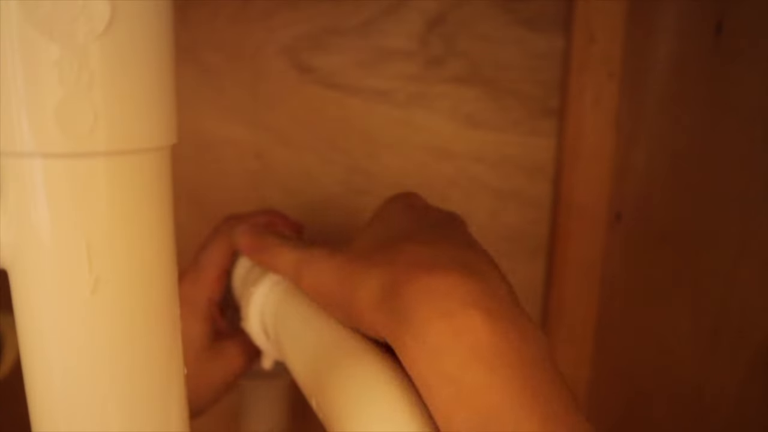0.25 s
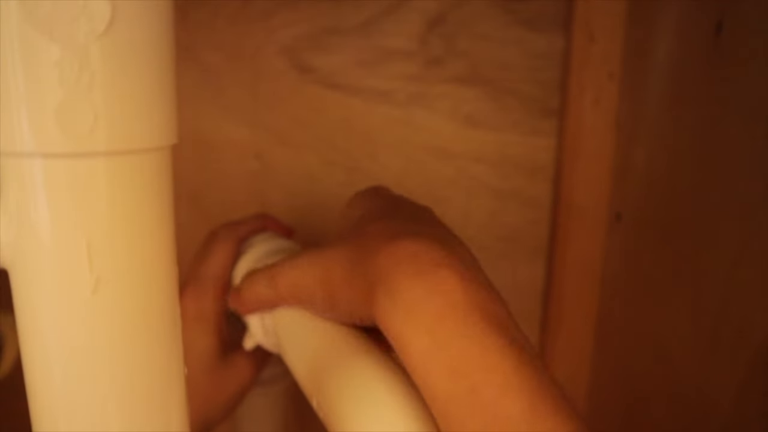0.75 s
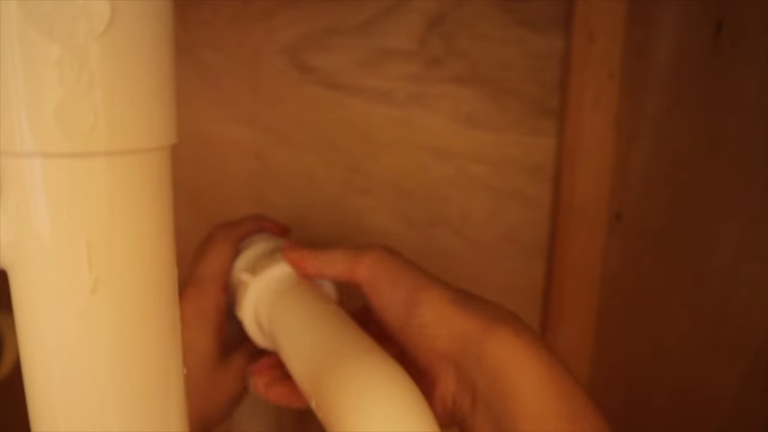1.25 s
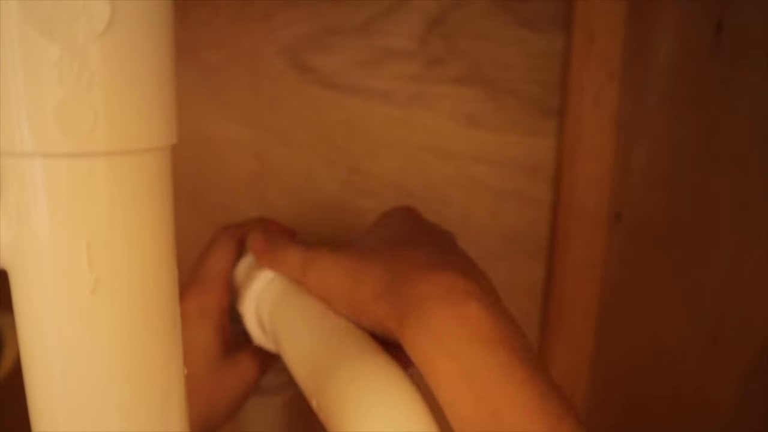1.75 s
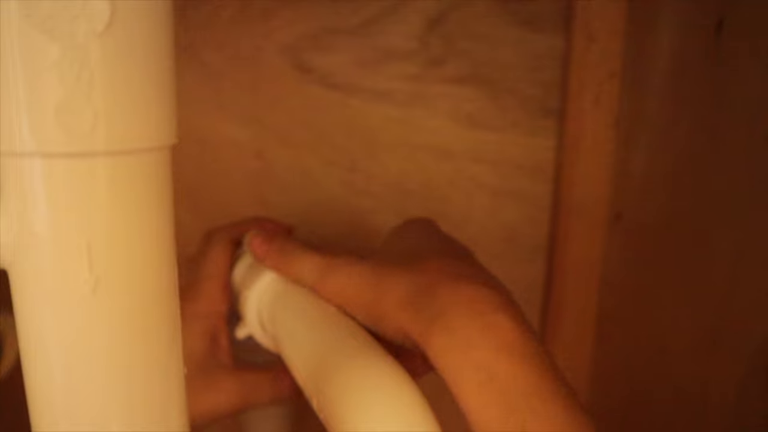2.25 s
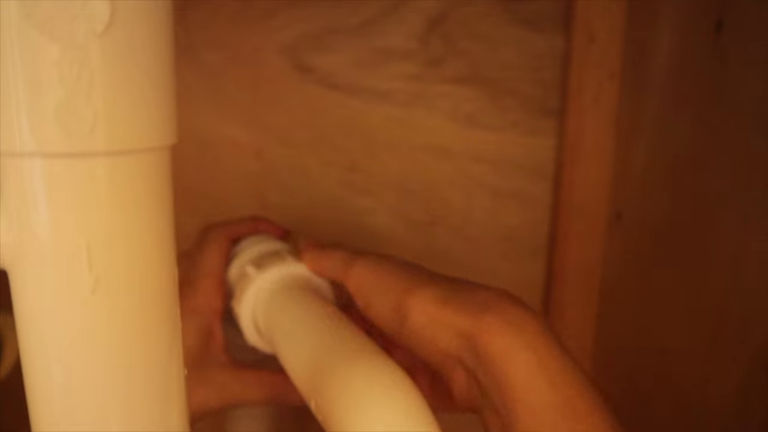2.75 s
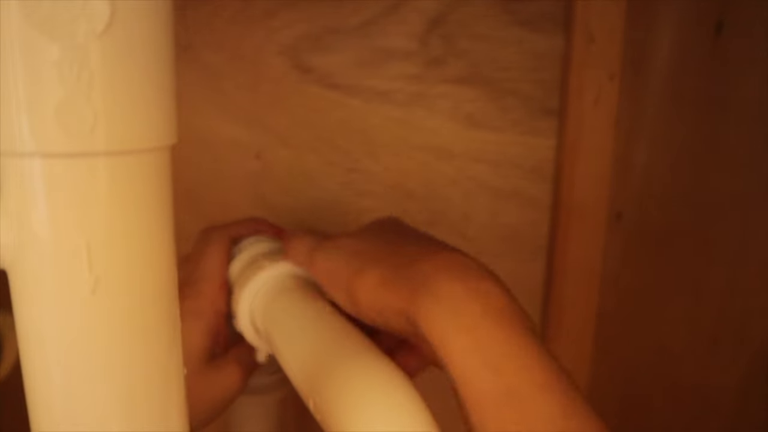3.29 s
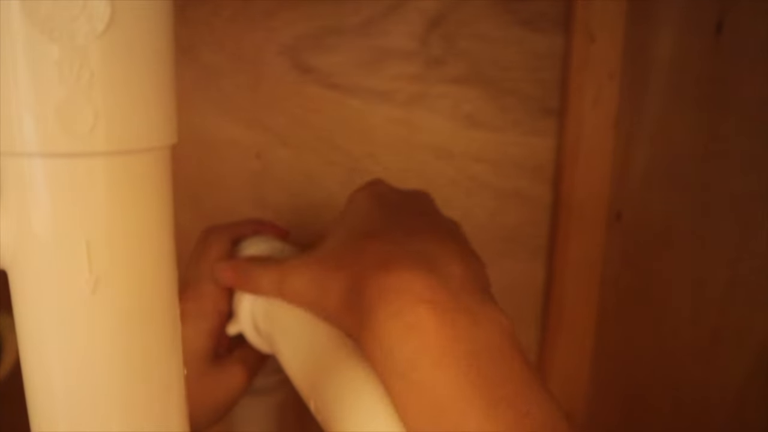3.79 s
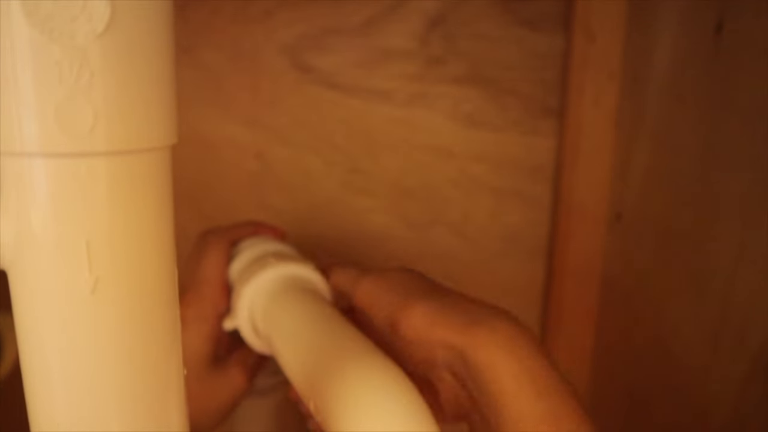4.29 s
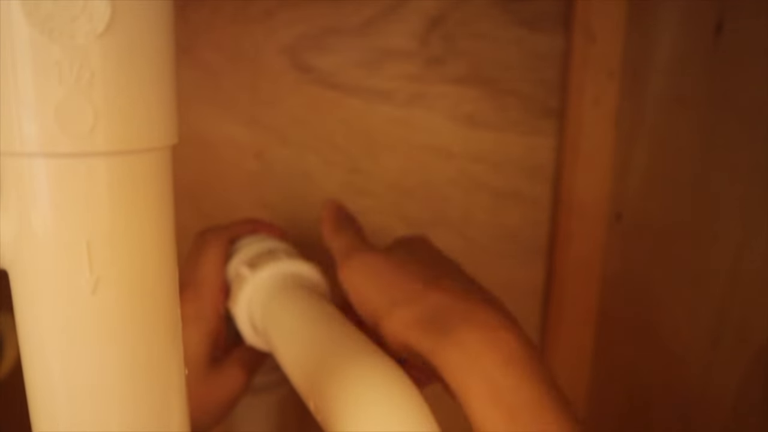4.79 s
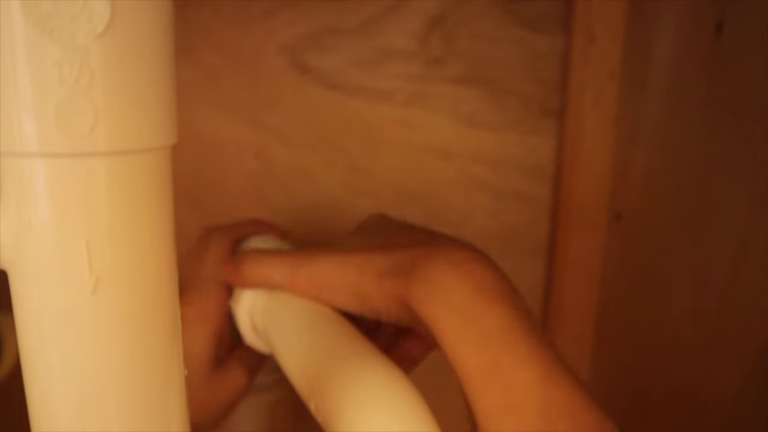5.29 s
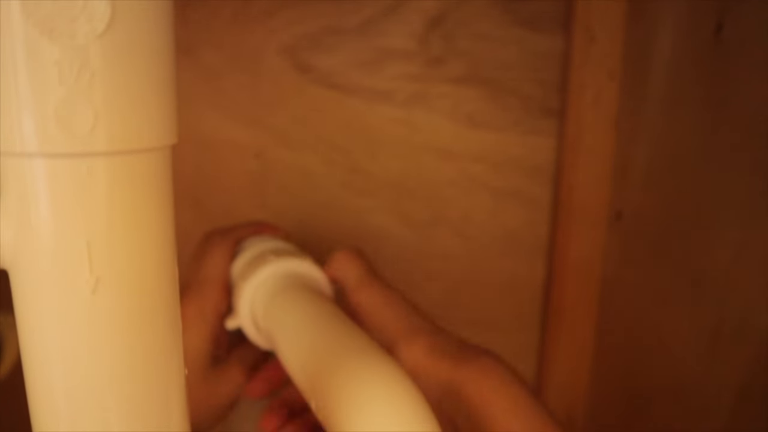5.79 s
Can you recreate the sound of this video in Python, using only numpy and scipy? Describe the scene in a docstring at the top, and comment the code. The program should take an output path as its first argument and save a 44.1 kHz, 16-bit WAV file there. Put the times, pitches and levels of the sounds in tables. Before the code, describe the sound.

Hollow plastic pipe knocks and crisp thread clicks crowd the start, then thin out into soft rubbing strokes and lighter taps, close up.

```python
"""A dull knock and a sharp click come first, as hands screw a plastic slip nut onto a drain pipe.
The work is inside a small wooden cabinet, close to a camera. Knocks and panel thumps are fading sine tones.
Thread clicks are short noise bursts; fingers sliding on plastic are grainy noise; the pipe also murmurs.
A faint falling tone comes late; hiss and a faint hum made from filtered noise lie beneath.
The camera widens the treble difference between its two microphone ports."""
import sys
import numpy as np
from scipy import signal
from scipy.fft import rfft, irfft, next_fast_len
from scipy.io import wavfile
from scipy.ndimage import uniform_filter1d, map_coordinates

SR = 44100
rng = np.random.default_rng(int(sys.argv[2]) if len(sys.argv) > 2 else 0)


def to_wav(sig):
    """Store sig (one row per channel, or 1-D mono) as 16-bit WAV at the path in sys.argv[1].

    Samples outside -1..1 are clipped; the rate is SR.
    """
    pcm = np.clip(np.atleast_2d(sig), -1, 1) * 32767
    pcm = np.round(pcm).astype(np.int16)
    wavfile.write(sys.argv[1], SR, pcm.T)  # frames by channels


N = 266275  # length [samples]

# dull knocks of the pipe: (time [s], peak [dB], pitch of the gripped length [Hz], hardness [dB])
PIPE_KNOCKS = [(0.001, -26, 476, 2.5), (0.063, -31, 350, 6), (0.075, -18.5, 456, -2.5),
               (0.136, -19, 308, 1), (0.231, -33, 362, 0), (0.399, -24, 355, 0), (0.42, -17, 443, -12),
               (0.449, -32.5, 390, -2), (0.504, -15, 372, 6), (0.566, -33, 368, -2), (0.576, -23, 348, 7.5),
               (0.65, -31.5, 358, -10), (0.741, -29, 235, 4), (0.775, -6.5, 365, 8), (0.899, -21.5, 331, 1),
               (0.977, -24, 440, 2.5), (1.47, -12.5, 348, 3), (1.532, -23, 355, 3), (1.756, -32, 363, -8),
               (1.786, -20.5, 256, 6), (1.829, -31.5, 447, 1.5), (1.889, -33.5, 219, 6),
               (1.906, -23, 373, 9), (1.958, -30.5, 467, 2), (2.043, -28.5, 260, 9), (2.154, -34, 288, -2),
               (2.35, -34.5, 252, -1), (2.512, -35.5, 452, 11), (2.64, -35.5, 383, 4),
               (2.728, -34.5, 440, 7), (2.96, -30.5, 237, 14), (3.036, -18.5, 478, 3),
               (3.047, -23.5, 405, -12), (3.218, -31.5, 440, 13), (3.236, -31.5, 467, 9),
               (3.287, -31, 365, 8), (3.357, -28, 475, 1.5), (3.409, -39, 373, 12), (3.512, -34.5, 412, 4),
               (3.524, -34.5, 450, 1), (3.673, -39.5, 247, 7), (3.792, -39.5, 243, 8),
               (3.983, -34.5, 228, 13), (4.048, -30, 456, 4), (4.064, -28.5, 239, 9.5),
               (4.2, -19.5, 372, -2.5), (4.61, -30, 470, 1), (4.794, -24, 224.5, 3), (5.099, -34, 348, -2),
               (5.251, -33, 447, -1), (5.298, -32, 360, -1), (5.472, -21, 234, 8), (5.551, -31, 356, 7),
               (5.805, -24.5, 249, -13), (5.851, -33.5, 234, -9)]
# ways the pipe can ring: (frequency [Hz], relative level [dB], basic time to fade by 60 dB [s])
PIPE_MODES = [(253.3, -3.5, 0.14), (311.6, -4, 0.087), (381.2, 1, 0.071), (449.8, 0, 0.11),
              (499.8, -10, 0.18), (600.6, -4.5, 0.11), (700, -11, 0.061), (857.5, -7.5, 0.084),
              (1050, -14, 0.12), (1314, -12, 0.1), (1526, -11.5, 0.087), (1896, -20, 0.12),
              (2500, -7, 0.071)]
# first push of a blow, at its pitch: (relative level [dB], basic time to fade by 60 dB [s])
FIRST_PUSH = (7.4, 0.017)
# thumps passed into the cabinet panels: (time [s], peak [dB], pitch [Hz])
PANEL_THUMPS = [(0.073, -35, 140), (0.134, -37, 148), (0.415, -42, 124), (0.503, -44, 164),
                (0.577, -30, 144), (0.776, -20.5, 161), (0.899, -25.5, 147), (0.974, -36, 193),
                (1.466, -25, 200), (1.534, -44, 164), (1.784, -36, 168), (1.903, -33.5, 159),
                (2.042, -30.5, 156), (2.153, -38.5, 148), (2.348, -38.5, 178), (2.959, -32.5, 149),
                (3.035, -35, 178), (3.67, -43, 155), (3.974, -35.5, 140), (4.057, -33, 162),
                (4.09, -33, 94), (4.192, -25, 176), (4.795, -27, 125.4), (4.829, -29, 98),
                (4.869, -33, 113), (5.098, -41, 190.8), (5.299, -36, 149), (5.471, -26.5, 151.5),
                (5.803, -39, 151), (5.852, -31.5, 146)]
# notes of a panel: (multiple of the pitch, level [dB], basic time to fade by 60 dB [cycles of the pitch])
PANEL_NOTES = [(1, -1, 12.8), (1.45, -9.5, 10.8)]
# sharp clicks of nut and thread:
# (time [s], level before fading [dB], lower part [dB], top part [dB], ringing pitch [Hz])
THREAD_CLICKS = [(0.001, -41, -2.5, -1, 1960), (0.068, -44, -5, 0, 1970), (0.1193, -44.5, -14, 5, 1650),
                 (0.2138, -53.5, -9, 18, 1930), (0.416, -50, -11, -13, 1650),
                 (0.5025, -37.5, 0.5, -3.5, 1900), (0.577, -33, -15, -22, 1770),
                 (0.6484, -57.5, -9, 2, 2190), (0.7736, -26.5, 3.5, -5, 1920), (0.8973, -52, -17, -9, 2920),
                 (0.935, -46.5, 6, -16, 1970), (0.9735, -39.5, 1, -12, 2000),
                 (1.0178, -52.5, -20, -9, 3500), (1.1502, -54, -12, 12, 2010),
                 (1.3608, -46.5, -4, -14, 2510), (1.4654, -33.5, 4, -6, 1940), (1.5407, -41, 5, -21, 2550),
                 (1.7556, -52, -8, -9, 1700), (1.7815, -29, -2.5, -9, 2460), (1.896, -47, 1, -12, 3800),
                 (1.9091, -41.5, -4, -11, 4070), (1.953, -38, -3, -21, 1870), (2.0385, -45, -9, 9, 3700),
                 (2.156, -50.5, -28, 13, 4270), (2.35, -39.5, 1, -3, 2100), (2.9632, -39, -4, -10, 1800),
                 (3.033, -32, -8, 14, 4100), (3.044, -37.5, -10, -7, 4070), (3.1915, -49, -5, 4, 2830),
                 (3.5084, -51.5, -6, -22, 2000), (4.312, -54, -15, -25, 1980),
                 (4.6088, -45.5, -20, -30, 2000), (4.6446, -51.5, -14, 9, 2050),
                 (5.065, -49.5, -3, 5, 2250), (5.2873, -48.5, -16, -47, 2200), (5.469, -40, -2, -12, 2000),
                 (5.801, -40, 1, 1, 2280), (5.852, -40.5, 2, -5, 2900)]
# basic colour of a click: (frequency [Hz], level [dB per Hz])
CLICK_COLOUR = [(350, -6.5), (600, -4), (966, -7.5), (1250, -5.5), (2160, -14.5), (3820, -13),
                (6150, -23.5), (6670, -19.5), (12000, -29), (13900, -37), (15500, -84)]
# how long nearby walls draw out a click: (frequency [Hz], time to fade by 60 dB [s])
WALL_FADE = [(200, 0.36), (1500, 0.13), (5000, 0.099), (12000, 0.11)]
# finger strokes over the plastic:
# (start [s], firmest [s], end [s], hiss at the firmest [dB], finest hiss against it [dB])
FINGER_STROKES = [(0.043, 0.145, 0.24, -50.5, -14), (0.195, 0.213, 0.33, -57, -5),
                  (0.704, 0.785, 0.83, -54, -24), (0.845, 0.89, 1.05, -55.5, -14),
                  (1.14, 1.182, 1.28, -48.5, -11), (1.25, 1.392, 1.43, -54.5, -18),
                  (1.403, 1.465, 1.55, -56, -9), (1.868, 1.93, 2.09, -48.5, -15),
                  (2.143, 2.176, 2.19, -51, -13), (2.26, 2.3, 2.7, -74, 3), (2.492, 2.74, 2.87, -51, -13.5),
                  (3.178, 3.4, 3.445, -44.5, -15), (3.49, 3.526, 3.7, -59.5, -11),
                  (3.79, 3.82, 3.83, -61, -2), (3.943, 3.976, 4.21, -58, -8),
                  (4.19, 4.233, 4.44, -62.5, -7), (4.299, 4.482, 4.58, -48, -15),
                  (4.723, 4.74, 4.92, -55, -16), (5.025, 5.097, 5.16, -59, -4), (5.23, 5.276, 5.7, -71, 0),
                  (5.374, 5.438, 5.76, -44, -13), (5.86, 5.933, 6.06, -54, -17)]
# colour of skin sliding on plastic: (frequency [Hz], level [dB per Hz])
SKIN_COLOUR = [(410, -27), (700, -7.5), (804, 0), (886, -5), (1260, -7), (1580, -1), (2240, -9),
               (2840, -5.5), (4740, -10), (9000, -18.5), (11700, -44), (19800, -120)]
# strength of the slips that make the held pipe grumble: (time [s], level [dB])
SLIP_LEVEL = [(0, -39), (0.18, -41), (0.27, -51.5), (1.3, -45), (1.44, -38.5), (1.6, -54), (1.82, -55),
              (1.97, -41), (2.3, -52), (2.55, -43), (2.75, -38), (3.03, -50), (3.41, -38), (3.5, -54),
              (3.78, -66), (4.0, -49), (4.32, -41.5), (4.7, -50), (5.0, -62), (5.28, -52), (5.47, -39),
              (5.65, -49.5), (6.04, -49)]
# a faint falling tone: (start [s], end [s], first pitch [Hz], last pitch [Hz], level [dB])
FALLING_TONE = (4.86, 5.2, 528, 500, -51)
# colour of room and microphone hiss: (frequency [Hz], level [dB per Hz])
HISS_COLOUR = [(12, -58), (20, -6), (119, 1.5), (196, -9.5), (298, -11.5), (465, -10), (686, -17),
               (1580, -21.5), (2760, -26), (7950, -40), (9000, -31.5), (10300, -19), (10900, -25),
               (11300, -54), (15500, -65)]
# hum: (centre frequency [Hz], distance to half strength [Hz], level [dB])
HUM_NOTE = (128.5, 4.3, -54)
# port difference against port sum: (frequency [Hz], gain [dB])
PORT_WIDTH = [(60, -31), (110, -17.5), (200, -7.5), (380, -6), (700, 1.5), (1290, 1), (2380, 4.5),
              (4400, 4.5), (8120, 7), (15000, 6.5)]


def amp(db):
    """Turn decibels into a plain multiplier."""
    return 10 ** (np.asarray(db) / 20)


def unit(x):
    """Scale to an average strength (rms) of 1."""
    return x / np.sqrt(np.mean(x ** 2) + 1e-20)


def along(points, hz):
    """Read a curve of (frequency [Hz], value) points on a log frequency axis."""
    f, value = np.transpose(points)
    return np.interp(np.log(hz + 1), np.log(f + 1), value)


def wobble(rate):
    """A smooth random curve with rate knots a second."""
    knots = rng.standard_normal(int(N * rate / SR) + 4)
    return map_coordinates(knots, [np.arange(N) * rate / SR])


def filtered(x, response):
    """Shape each frequency of x by a response, which may also shift its phase."""
    n = x.shape[-1]
    padded = next_fast_len(n + 8192)
    spectrum = rfft(x, padded) * response(np.fft.rfftfreq(padded, 1 / SR))
    return irfft(spectrum, padded)[..., :n]


def noise(response, size=N):
    """Two unrelated coloured noises, together of rms 1: port sum and port difference."""
    return unit(filtered(rng.standard_normal((2, size)), response))


def ring(modes, weight_db, slow, rise, t):
    """A blow sets off fading sine tones, with random strengths for the port sum and difference."""
    hz, db, t60 = np.transpose(modes)[..., None]
    strength_db = db + weight_db + rng.normal(0, 2.12, (2, len(modes), 1))
    level = amp(strength_db - 60 * t / (slow * t60))
    # the modes start nearly in step in the sum, so the blow begins with one strong swing
    phase_spread = np.reshape([.3, np.pi], (2, 1, 1))
    phase = rng.normal(0, 1, (2, len(modes), 1)) * phase_spread
    varied_hz = hz * (1 + rng.normal(0, .02, hz.shape))
    tone = np.sin(2 * np.pi * varied_hz * t + phase)
    sound = (level * tone).sum(axis=1) * (1 - np.exp(-t / rise))
    return sound / np.abs(sound[0]).max()


def patches(x, depth_db):
    """Random gain that differs from band to band and moment to moment."""
    z = signal.stft(x, nperseg=256)[2]
    field = rng.standard_normal(z.shape[1:])
    field = uniform_filter1d(field, size=5, axis=0)  # blend neighbouring bands
    field = uniform_filter1d(field, size=12, axis=1)  # blend neighbouring moments
    return unit(signal.istft(z * amp(depth_db * unit(field)), nperseg=256)[1][:, :N])


def knocks():
    """The gripped length rings at its pitch and favours nearby modes; hard blows reach the upper modes."""
    ring_factor, firm_db, longer_per_db = 1.074, -17.5, 0.0452
    out, t = np.zeros((2, N + SR)), np.arange(SR // 3) / SR
    for s, db, hz, hard_db in PIPE_KNOCKS:
        modes = np.array(PIPE_MODES + [(hz, -1.5, .09), (hz, *FIRST_PUSH)])
        near_db = -8 * np.abs(np.log2(modes[:, :1] / hz))
        upper_db = hard_db * np.clip(np.log2(modes[:, :1] / 420), 0, 1)
        # blows lighter than firm are gripped less and ring longer
        slow = ring_factor + longer_per_db * max(firm_db - db, 0)
        blow = ring(modes, near_db + upper_db, slow, 0.0031, t)
        first = max(round((s - .0005) * SR), 0)  # begin 0.5 ms ahead of the listed time
        out[:, first:][:, :len(t)] += amp(db) * blow
    return out[:, :N] * amp([[0], [-4]])


def thumps():
    """A panel answers with one low note and a weaker one above it."""
    out, t = np.zeros((2, N + SR)), np.arange(SR // 2) / SR
    for s, db, hz in PANEL_THUMPS:
        notes = np.multiply(PANEL_NOTES, [hz, 1, 1 / hz])  # multiples to Hz, cycles to seconds
        out[:, round(s * SR):][:, :len(t)] += amp(db) * ring(notes, 0, 0.87, 0.011, t)
    return out[:, :N] * amp([[0], [-4]])


def clicks():
    """A noise burst with one plastic resonance; nearby walls draw out its lower part longest."""
    click_t60, rise = 0.059, 0.00033  # [s]
    out, t = np.zeros((2, N + SR)), np.arange(SR // 5) / SR
    for s, db, low_db, top_db, pitch in THREAD_CLICKS:
        tilt = [(900, low_db), (2000, 0), (6000, 0.25 * min(top_db, 0)), (11000, top_db)]

        def colour(hz):
            """Click colour with its own tilt and a peak at the ringing pitch."""
            peak = 1 + amp(2.5) / (1 + ((hz - pitch) / (.07 * pitch)) ** 2)
            return amp(along(CLICK_COLOUR, hz) + along(tilt, hz)) * peak

        burst = noise(colour, size=len(t))
        # the tail is the same noise, with each band fading at its own speed
        hz, frame, z = signal.stft(burst, SR, nperseg=128)
        wall_gain = amp(-60 * frame / along(WALL_FADE, hz)[:, None])
        tail = signal.istft(z * wall_gain, SR, nperseg=128)[1][:, :len(t)]
        click = burst * amp(-60 * t / click_t60) + amp(-1.5) * tail
        out[:, round(s * SR):][:, :len(t)] += amp(db) * click * (1 - np.exp(-t / rise))
    return out[:, :N]


def rubbing():
    """Skin sticks and slips in tiny grains along each stroke, louder under firmer pressure."""
    grow_curve, ease_curve = 0.43, 0.97  # powers; under 1 makes a rounded curve
    t, coarse, finest = np.arange(N) / SR, np.zeros(N), np.zeros(N)
    for start, firm, end, db, fine_db in FINGER_STROKES:
        growing = np.interp(t, [start, firm], [0, 1]) ** grow_curve
        easing = np.interp(t, [firm, end], [1, 0]) ** ease_curve
        coarse += amp(db) * growing * easing
        finest += amp(db + fine_db) * growing * easing
    grain = amp(1.3 * wobble(300) + 0.95 * wobble(45))
    skin = patches(grain * noise(lambda hz: amp(along(SKIN_COLOUR, hz))), depth_db=1.1)
    fine_colour = [(5000, -34), (8000, -10), (11500, 4), (13500, -6.5), (15500, -25)]  # (Hz, dB per Hz)
    fine = patches(grain * noise(lambda hz: amp(along(fine_colour, hz))), depth_db=2.5)
    return coarse * skin + finest * fine


def drone():
    """Soft uneven slips in the thread keep the held pipe's modes murmuring, mostly the low ones."""
    s, level_db = np.transpose(SLIP_LEVEL)
    soft = noise(lambda hz: 1 / (1 + (hz / 800) ** 4))
    slips = amp(np.interp(np.arange(N) / SR, s, level_db) + 2.9 * wobble(35)) * soft

    def pipe_response(f):
        """Sum of resonances; a shorter fade means a broader one."""
        total = 0
        for centre, db, t60 in PIPE_MODES:
            drive = 1j * f * 2.42 / t60
            damping = 1j * f * 2.82 / t60
            total = total + amp(db) * drive / (centre * centre - f * f + damping)
        return total

    return filtered(slips, pipe_response)


def tone():
    """A wavering sine note that sinks, swells and fades once."""
    start, end, first_hz, last_hz, db = FALLING_TONE
    progress = np.clip((np.arange(N) / SR - start) / (end - start), 0, 1)
    hz = first_hz + (last_hz - first_hz) * progress + 2.59 * wobble(14)
    swell = np.sqrt(np.abs(np.sin(np.pi * progress)))
    note = amp(db + 1.1 * wobble(15)) * swell * np.sin(2 * np.pi * np.cumsum(hz) / SR)
    return note * np.array([[1], [.4]])


def background():
    """Nearly steady hiss, and a hum of narrow-band noise that wavers."""
    hiss_db = -47.5
    centre, width, hum_db = HUM_NOTE
    hum = noise(lambda f: 1 / (1 + ((f - centre) / width) ** 2))
    hiss_level = amp(hiss_db + 0.58 * wobble(2.65))
    hiss = hiss_level * noise(lambda f: amp(along(HISS_COLOUR, f)))
    return hiss + amp(hum_db) * hum


def scene():
    """Add all layers as port sum (mid) and difference (side), then turn them into two ports."""
    mid, side = knocks() + thumps() + clicks() + rubbing() + drone() + tone() + background()
    side = side + .1 * mid  # direct sound is a little stronger at one port
    return np.array([mid - side, mid + side])


def record(dry):
    """The port difference is faint in the bass and lifted in the treble, under a sharp upper limit."""
    top_hz = 15700
    mid, side = (dry[0] + dry[1]) / 2, (dry[0] - dry[1]) / 2
    side = filtered(side, lambda hz: amp(along(PORT_WIDTH, hz)))
    return filtered(np.array([mid + side, mid - side]), lambda hz: hz < top_hz)


dry = scene()
out = record(dry)
to_wav(out)
```